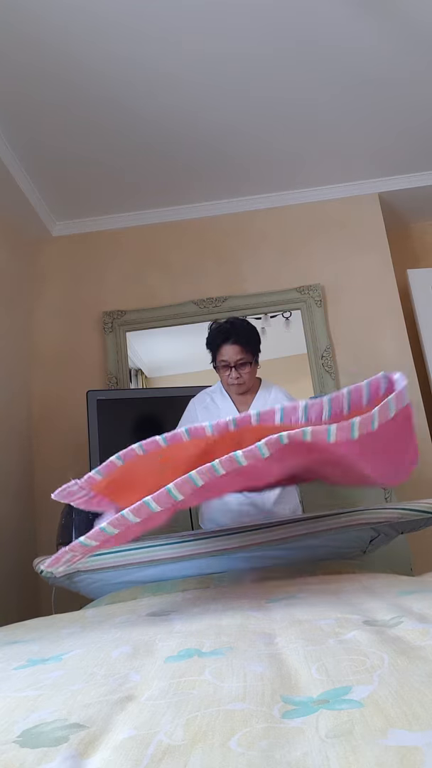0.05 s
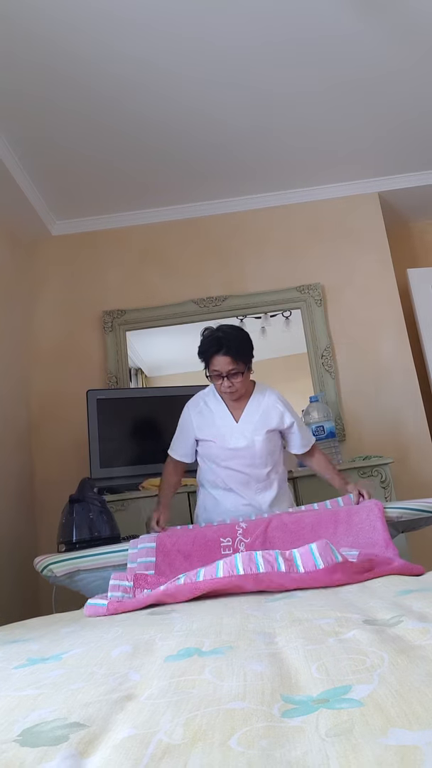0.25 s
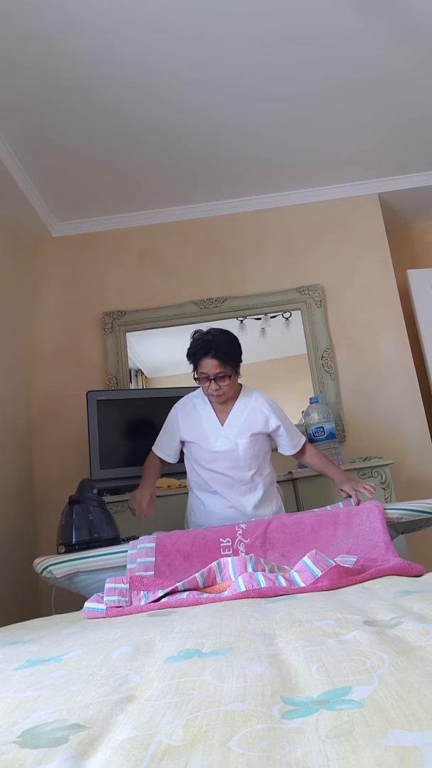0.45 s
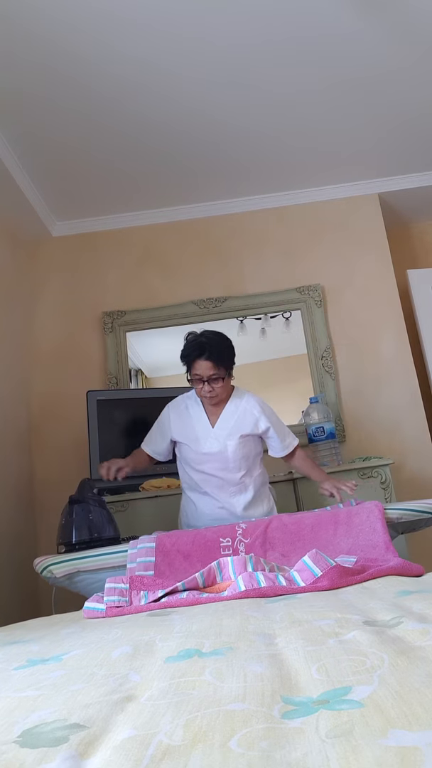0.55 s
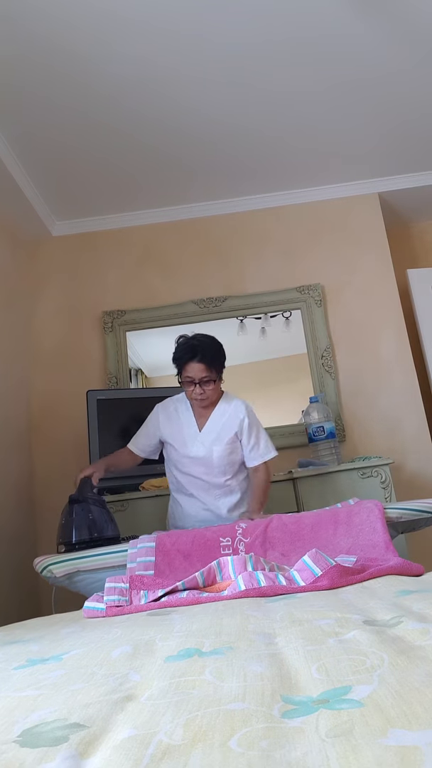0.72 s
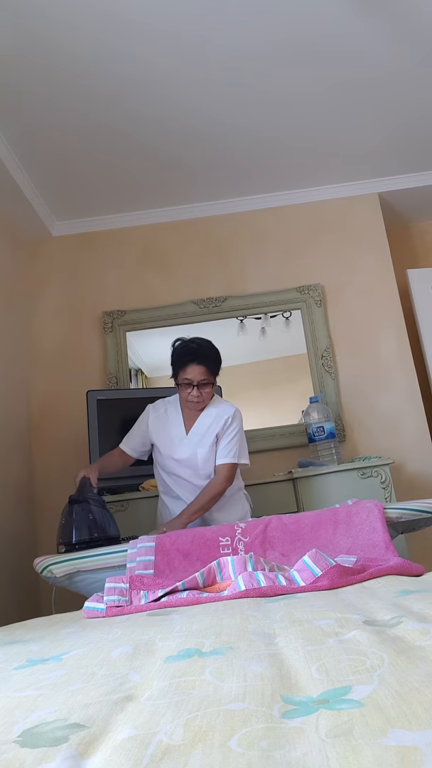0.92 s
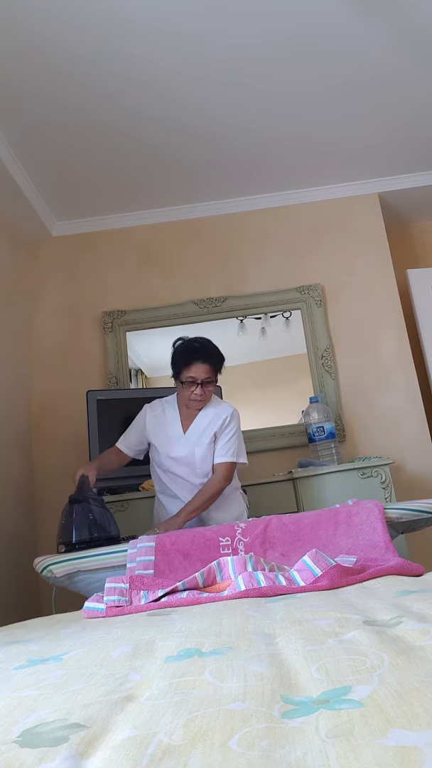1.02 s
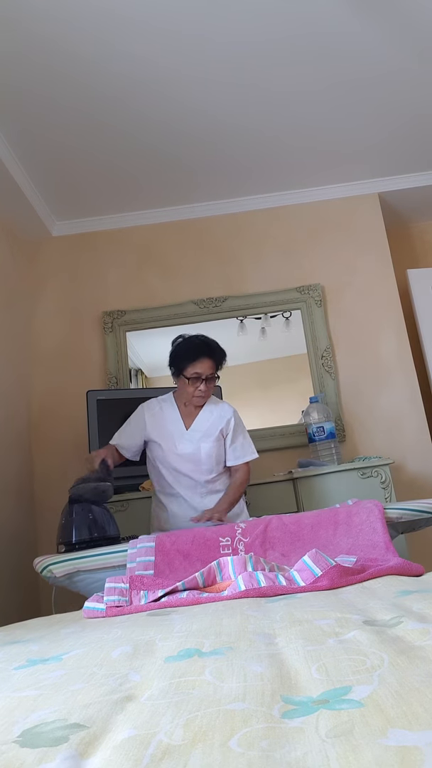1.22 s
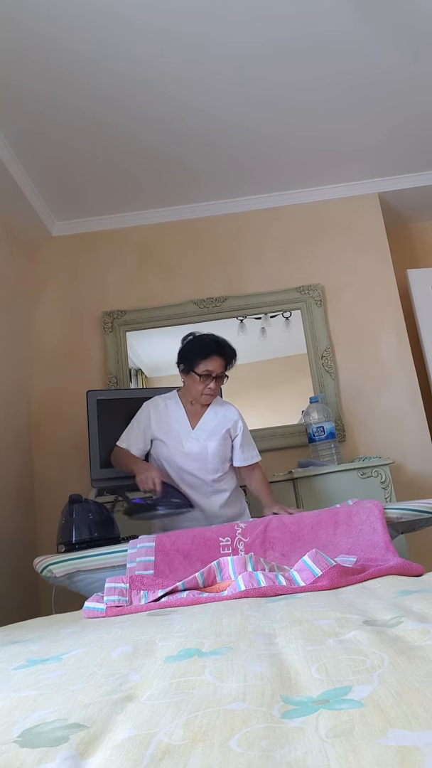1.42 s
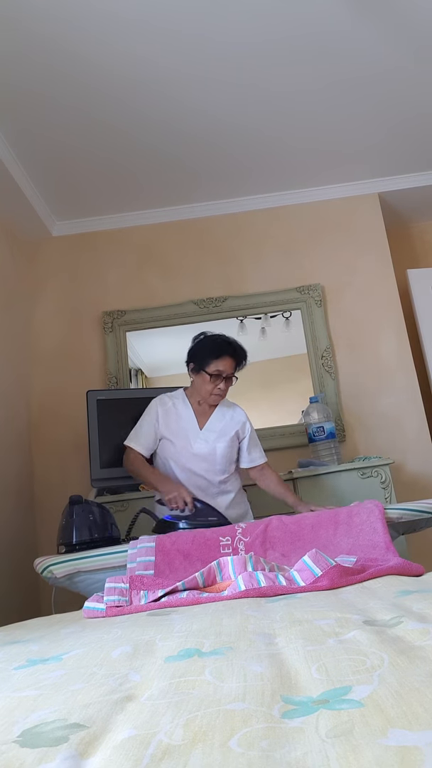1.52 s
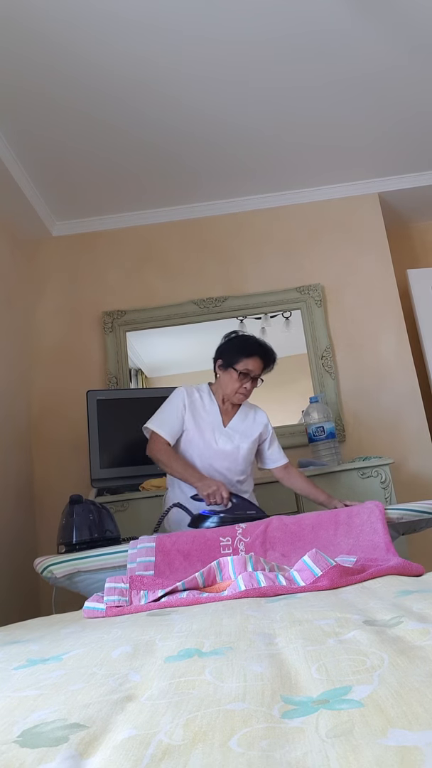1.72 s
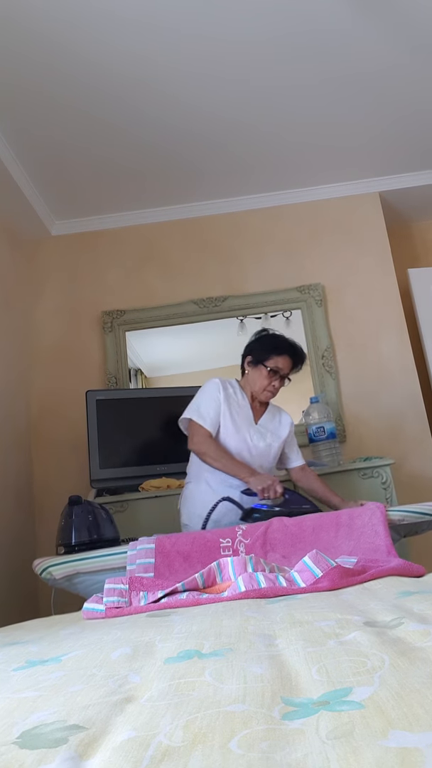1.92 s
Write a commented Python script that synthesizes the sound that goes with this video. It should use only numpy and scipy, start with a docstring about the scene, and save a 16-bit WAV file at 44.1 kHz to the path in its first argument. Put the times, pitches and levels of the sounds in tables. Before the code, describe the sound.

A towel lands on an ironing board with a soft, ragged thump at about 0.3 seconds. Around 0.8 seconds an iron clacks on its plastic base while a hand rubs the cloth. Light hollow knocks follow near 1.15 seconds as the iron lifts. At 1.6 seconds it thuds onto the padded board, which shudders, and begins a faint glide. Low room noise and a thin hiss lie underneath.

```python
"""A towel, flung onto an ironing board in a small bedroom, lands fold by fold in a soft, ragged thump.
A hand smooths it while the iron clacks on its plastic base and lifts off with hollow knocks.
The iron comes down on the padded board, which shudders, and starts to glide over the cloth.
Contacts are dulled clicks, some ringing the board or the iron's shell; rubbing is shaped noise.
Low room noise and a thin hiss lie underneath."""
import sys
import numpy as np
from scipy import signal
from scipy.fft import rfft, irfft
from scipy.io import wavfile
from scipy.ndimage import uniform_filter1d

SR = 44100
rng = np.random.default_rng(int(sys.argv[2]) if len(sys.argv) > 2 else 0)


def transcribe(signal):
    """Save signal, clipped to [-1, 1], as a 16-bit WAV file at the path in sys.argv[1]."""
    frames = np.atleast_2d(signal).T
    limited = np.clip(frames, -1, 1)
    pcm = np.round(limited * 32767).astype(np.int16)
    wavfile.write(sys.argv[1], SR, pcm)


N = 85995
T = np.arange(N) / SR

# contacts (time [s], strength [dB], dull above [Hz])
TOWEL_FOLDS = [(.198, -25, 300), (.2225, -16.5, 330), (.239, -14, 450), (.2525, -8, 330), (.2605, -2, 1100),
               (.2645, -0.5, 600), (.268, -2, 400), (.2765, -1.5, 330), (.291, -6.5, 420), (.329, -11, 250),
               (.352, -15.5, 230)]
LATCH_CLACKS = [(.8045, -10, 7100), (.8112, -7.5, 13500), (.8178, -9.5, 4800), (.826, -16, 4500),
                (.8435, -17, 7000)]
PLASTIC_TAPS = [(.818, -10, 900), (1.134, -18.5, 1710), (1.149, -22, 1900), (1.168, -25.5, 1900),
                (1.437, -31.5, 1900), (1.455, -25, 900)]
SOLE_CONTACTS = [(1.571, -8, 760), (1.579, -11, 600), (1.5865, -8.5, 700), (1.592, -1.5, 750),
                 (1.595, -6, 650), (1.603, -5.5, 503), (1.610, -2.5, 750), (1.618, -2.5, 496),
                 (1.634, 0, 225), (1.702, -16.5, 520)]
# contact spectra (frequency [Hz], relative level [dB])
FOLD_SPECTRUM = [(25, -11), (50, 9), (80, 1.5), (165, 4.5), (260, -1), (380, -6.5), (700, -16),
                 (1500, -16.5), (4000, -30)]
CLACK_SPECTRUM = [(100, -28), (250, -30), (450, -2), (750, -19), (1200, 1.5), (1600, -2.5), (3000, 8.5),
                  (5000, 2), (7700, 1.5), (8800, -11.5), (15000, -1.5)]
TAP_SPECTRUM = [(100, -17.5), (350, 1.5), (800, -4), (1600, 4), (3000, -8), (6000, -21.5)]
SOLE_SPECTRUM = [(25, -21), (50, 3.5), (80, -13), (140, 7), (220, -2), (350, 1), (520, -10), (760, -8),
                 (1150, -16.5)]
# hollow base knocks (time [s], level [dB], pitch [Hz], t60 [s])
BASE_KNOCKS = [(1.139, -45, 345, .22), (1.152, -43, 295, 0.12), (1.172, -41, 222, .15)]
# modes of board and iron shell (frequency [Hz], relative level [dB], t60 [s])
BOARD_MODES = [(79, -36.5, 0.3), (127.5, -38.5, 0.39), (178.3, -36, 0.42), (257.3, -39.5, 0.3),
               (338.2, -38.5, 0.31), (380, -43, 0.26), (564, -48, 0.13), (625, -48, 0.18),
               (726, -49.5, 0.25)]
SHELL_MODES = [(440, -52, .3), (2373, -49, .25), (3100, -45, 0.2), (3800, -46, 0.18), (4872, -47, 0.16)]
# noise swells (start [s], rise [s], hold [s], t60 [s], level [dB])
TREMBLE_SWELLS = [(-.03, 0.0073, 0.036, 0.54, -59), (0.359, 0.02, 0.021, 0.8, -54.5),
                  (0.821, 0.048, 0.019, 0.58, -51)]
CLOTH_SWELLS = [(.185, .07, 0.041, 0.35, -42), (1.565, 0.017, 0.034, 0.27, -39)]  # towel landing, then padding squeezed
WHUMP_SWELL = (.238, .026, .012, .1667, -40)
JUDDER_SWELL = (1.71, .06, .14, .4, -55.5)
# sliding of hand and iron (time [s], level [dB])
HAND_LEVELS = [(.72, -84), (.77, -63.5), (.81, -49), (.91, -47.5), (1.04, -52), (1.08, -59), (1.17, -69),
               (1.28, -74.5)]
GLIDE_LEVELS = [(1.1, -69), (1.27, -70), (1.41, -69.5), (1.56, -57), (1.75, -60.5), (1.88, -58.5),
                (1.95, -63.5)]
# noise spectra (frequency [Hz], relative density [dB])
ROOM_NOISE_SPECTRUM = [(25, -7.5), (86, -2), (122, -6.5), (148, -17), (331, -24), (445, -18), (762, -22),
                       (997, -23), (1710, -22.5), (3200, -29), (4040, -24.5), (15500, -35)]
TREMBLE_SPECTRUM = [(20, -1.5), (45, 1), (85, 1), (140, -10.5), (200, -18), (400, -24.5), (1000, -36.5)]
SWISH_SPECTRUM = [(100, 16), (300, 13), (600, 12), (900, 3), (1400, 1), (2600, -3), (5000, -3),
                  (7700, -6.5), (9500, -12.5), (15000, -8)]
HAND_SPECTRUM = [(150, 0), (400, -2), (900, -2), (2000, -1.5), (4000, -2.5), (7700, -6), (9500, -12),
                 (15000, -8.5)]
GLIDE_SPECTRUM = [(100, -17), (400, 5.5), (900, -6.5), (2500, -7.5), (4000, -4), (7700, -0.5), (9500, -9.5),
                  (15000, -2)]
SQUEEZE_SPECTRUM = [(200, 5), (450, 10), (900, 0.5), (2600, 0.5), (5000, -4), (7700, -9.5), (9500, -13),
                    (15000, -11.5)]
WHUMP_SPECTRUM = [(80, -17), (250, -.5), (650, -2.5), (2500, -33)]
JUDDER_SPECTRUM = [(50, 3), (130, -2), (500, -23)]
HISS_SPECTRUM = [(2000, -28), (2550, -15), (3300, -29), (3950, -4.5),
                 (4500, -12.5), (5300, -9.5), (6500, -29), (9000, -53)]
FLAT_SPECTRUM = [(1, 0), (2, 0)]
# bedroom decay (frequency [Hz], t60 [s])
ROOM_DECAY = [(60, 0.18), (130, 0.3), (280, 0.29), (800, 0.28), (3000, 0.19), (6000, 0.14), (14000, 0.19)]
# microphone balance (frequency [Hz], left minus right [dB])
MIC_BALANCE = [(100, -0.5), (300, -2), (700, -3), (1400, -1), (3000, -5), (6000, -1.5), (9500, 1),
               (13000, 3)]

MIC_SPACING_M, SOUND_M_PER_S, BASS_COHERENCE = .17, 343, .95
ROOM_BUILD_S = .00067
SWAY_DB, SWAY_HZ, SWAY_T60_S = -12, 130, .25  # bass swaying wall to wall
LOW_CUT_HZ, HIGH_CUT_HZ = 30, 15850


def amp(db):
    """Decibels to gain."""
    return 10 ** (np.asarray(db) / 20)


def unit_rms(x):
    """Scale to rms 1."""
    return x / np.sqrt(np.mean(x ** 2) + 1e-20)


def lookup(table, hz):
    """Interpolate over log frequency."""
    table_hz, values = np.transpose(table)
    return np.interp(np.log(hz + 1), np.log(table_hz + 1), values)


def convolve(x, response):
    """Convolve in time, cut to scene length."""
    return signal.fftconvolve(np.atleast_2d(x), np.atleast_2d(response), axes=1)[:, :N]


def decay(t60_s, age_s=T):
    """Exponential fall, 60 dB per t60_s."""
    return np.exp(-np.log(1000) * age_s / t60_s)


def swell(start_s, rise_s, hold_s, t60_s, db):
    """Envelope: rise, hold, decay."""
    rise = np.clip((T - start_s) / rise_s, 0, 1) ** 2
    return amp(db) * rise * decay(t60_s, np.maximum(T - start_s - rise_s - hold_s, 0))


def stroke(levels):
    """Envelope along a level curve, silent outside it."""
    return amp(np.interp(T, *np.transpose(levels), left=-np.inf, right=-np.inf))


def diffuse(spectrum):
    """Noise from all sides at two close microphones: bass alike, treble unrelated."""
    hz = np.fft.rfftfreq(N, 1 / SR)
    coherence = BASS_COHERENCE * np.sinc(2 * hz * MIC_SPACING_M / SOUND_M_PER_S)
    phasors = np.exp(2j * np.pi * rng.random((2, len(hz))))
    mid, side = phasors * np.sqrt([1 + coherence, 1 - coherence])
    return unit_rms(irfft(np.array([mid + side, mid - side]) * amp(lookup(spectrum, hz)), N))


def fibre_noise(spectrum, grain_db=1, grain_samples=90):
    """Fibres catch and slip: noise with a fine flicker."""
    flicker = unit_rms(uniform_filter1d(rng.standard_normal(N), grain_samples))
    return unit_rms(amp(grain_db * flicker)) * diffuse(spectrum)


def room(x, diffuse_hz):
    """Direct sound below diffuse_hz; above it reflections, each band with its own decay."""
    hz = np.fft.rfftfreq(N, 1 / SR)
    noise = rfft(diffuse(FLAT_SPECTRUM))
    edges_hz = np.append(0, np.geomspace(60, SR / 2, 22))
    build = 1 - np.exp(-T / ROOM_BUILD_S)
    tail = 0
    for lo, hi in zip(edges_hz, edges_hz[1:]):
        centre_hz = (lo + hi) / 2
        band = irfft(noise * ((hz >= lo) & (hz < hi)), N)
        band = unit_rms(band * build * decay(lookup(ROOM_DECAY, centre_hz)))
        width_gain = np.sqrt((hi - lo) / (SR / 2) / N)
        tail = tail + band * width_gain * centre_hz / np.hypot(centre_hz, diffuse_hz)
    sway = unit_rms(rng.standard_normal(N) * decay(SWAY_T60_S)) / np.sqrt(N)
    sway = signal.lfilter(*signal.butter(2, SWAY_HZ, fs=SR), sway)
    tail = tail + amp(SWAY_DB) * np.array([sway, -sway])
    direct = signal.lfilter(*signal.butter(1, diffuse_hz, fs=SR), x)
    return direct + convolve(x, tail)


def click(spectrum, dull_hz, size=8192):
    """Minimum-phase click, softened above dull_hz."""
    hz = abs(np.fft.fftfreq(size, 1 / SR))
    gain = unit_rms(amp(lookup(spectrum, hz))) / np.hypot(1, (hz / dull_hz) ** 2)
    log_response = np.conj(signal.hilbert(np.log(gain + 1e-6)))
    return np.fft.ifft(np.exp(log_response)).real[:size // 2]


def blows(contacts, spectrum):
    """One click per contact."""
    return sum(convolve(signal.unit_impulse(N, round(at_s * SR)), amp(db) * click(spectrum, dull_hz))
               for at_s, db, dull_hz in contacts)


def ringing(modes, damping=1):
    """Modal impulse response; damping divides every t60."""
    return sum(amp(db) * decay(t60_s / damping) * np.cos(2 * np.pi * hz * T) for hz, db, t60_s in modes)


def struck(contacts, spectrum, ring, ring_db, diffuse_hz):
    """Contacts through the room, plus the ring they excite."""
    impacts = room(blows(contacts, spectrum), diffuse_hz)
    return impacts + amp(ring_db) * convolve(blows(contacts, FLAT_SPECTRUM), ring)


def background(room_db=-66.5, hiss_db=-71):
    """Low room noise; thin steady hiss on the right."""
    pan = amp([[-12], [0]])
    return amp(room_db) * diffuse(ROOM_NOISE_SPECTRUM) + amp(hiss_db) * pan * diffuse(HISS_SPECTRUM)


def board_tremble():
    """The board trembles on its legs: swells of rumble."""
    return sum(swell(*row) for row in TREMBLE_SWELLS) * diffuse(TREMBLE_SPECTRUM)


def towel_landing():
    """Folds hit the board in turn; cloth rushes flat and pushes air out."""
    ring = ringing(BOARD_MODES, damping=1.17)
    thump = struck(TOWEL_FOLDS, FOLD_SPECTRUM, ring, ring_db=-7.5, diffuse_hz=450)
    swish = swell(*CLOTH_SWELLS[0]) * diffuse(SWISH_SPECTRUM)
    whump = swell(*WHUMP_SWELL) * diffuse(WHUMP_SPECTRUM)
    return thump + swish + whump


def hand_smoothing():
    """A hand rubs over the towel's fibres."""
    return stroke(HAND_LEVELS) * fibre_noise(HAND_SPECTRUM)


def iron_unlatch(direct_db=-15):
    """The catch clacks on the base and rings the iron's shell."""
    clack = struck(LATCH_CLACKS, CLACK_SPECTRUM, ringing(SHELL_MODES), ring_db=-5, diffuse_hz=300)
    return clack + amp(direct_db) * blows(LATCH_CLACKS, CLACK_SPECTRUM)


def iron_lift(rise_s=.005):
    """A dull body knock under the latch clack, then light plastic taps from handling; knocks on the hollow
    base, each lower in pitch."""
    knocks = sum(swell(at_s, rise_s, 0, t60_s, db) * np.sin(2 * np.pi * hz * (T - at_s))
                 for at_s, db, hz, t60_s in BASE_KNOCKS)
    return room(knocks, diffuse_hz=600) + room(blows(PLASTIC_TAPS, TAP_SPECTRUM), diffuse_hz=250)


def iron_glide():
    """Sliding noise: faint as the iron swings in, louder on the cloth."""
    return stroke(GLIDE_LEVELS) * diffuse(GLIDE_SPECTRUM)


def iron_landing():
    """The sole thumps the board and squeezes the padding; its drag keeps the board ringing."""
    ring = ringing(BOARD_MODES, damping=1.2)
    thump = struck(SOLE_CONTACTS, SOLE_SPECTRUM, ring, ring_db=-6, diffuse_hz=380)
    squeeze = swell(*CLOTH_SWELLS[1]) * fibre_noise(SQUEEZE_SPECTRUM)
    judder = unit_rms(convolve(diffuse(JUDDER_SPECTRUM), ringing(BOARD_MODES)))
    return thump + squeeze + swell(*JUDDER_SWELL) * judder


def scene():
    """Towel, iron and trembling board in the quiet bedroom."""
    towel = towel_landing() + hand_smoothing()
    iron = iron_unlatch() + iron_lift() + iron_landing() + iron_glide()
    return towel + iron + board_tremble() + background()


def record(dry):
    """Two microphones of unequal colour; low cut, high cut."""
    lean_db = lookup(MIC_BALANCE, np.fft.rfftfreq(2 * N, 1 / SR)) / 2
    heard = irfft(rfft(dry, 2 * N) * amp([lean_db, -lean_db]))[:, :N]
    heard = signal.lfilter(*signal.butter(2, LOW_CUT_HZ, "high", fs=SR), heard)
    high_cut = signal.firwin(1023, HIGH_CUT_HZ, window=("kaiser", 9), fs=SR)
    return signal.oaconvolve(heard, high_cut[None], "same")


dry = scene()
out = record(dry)
transcribe(out)
```